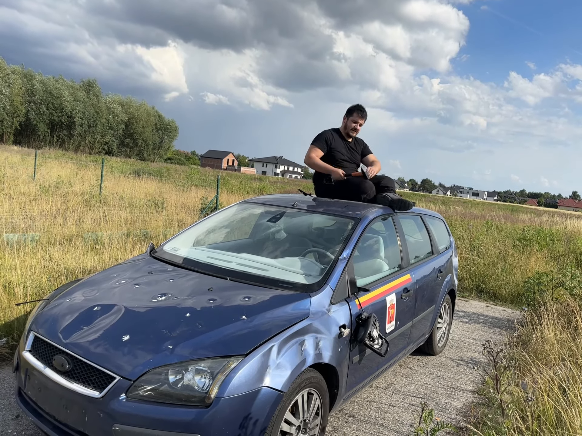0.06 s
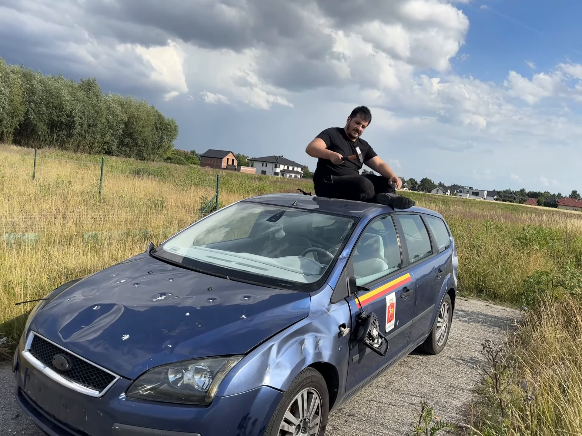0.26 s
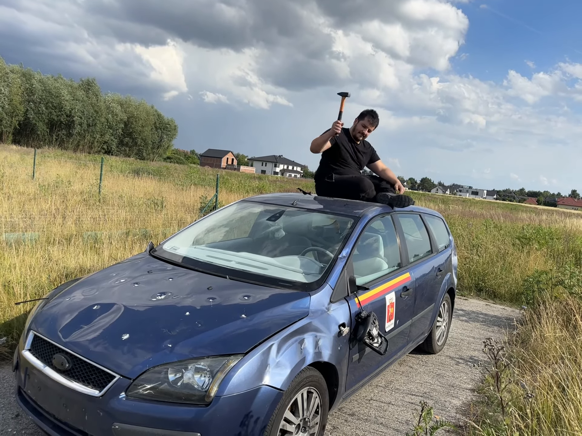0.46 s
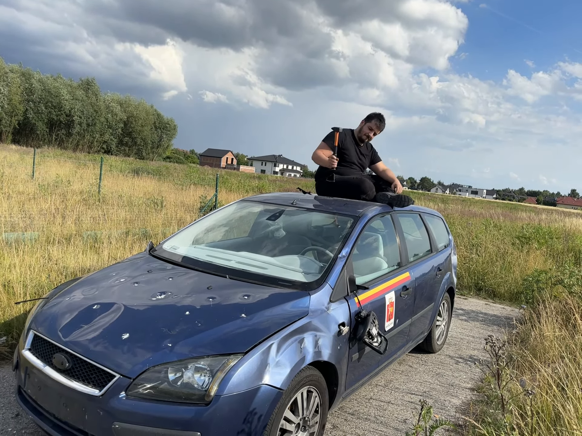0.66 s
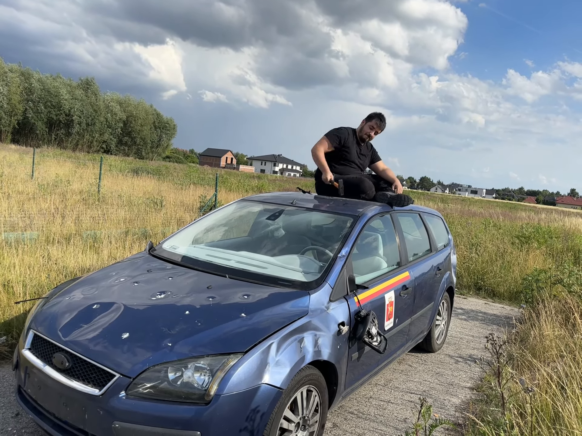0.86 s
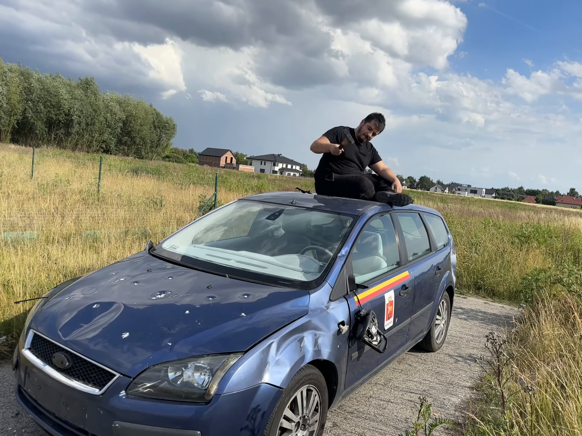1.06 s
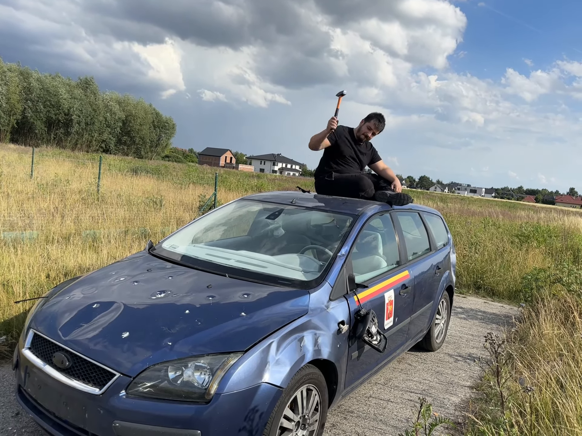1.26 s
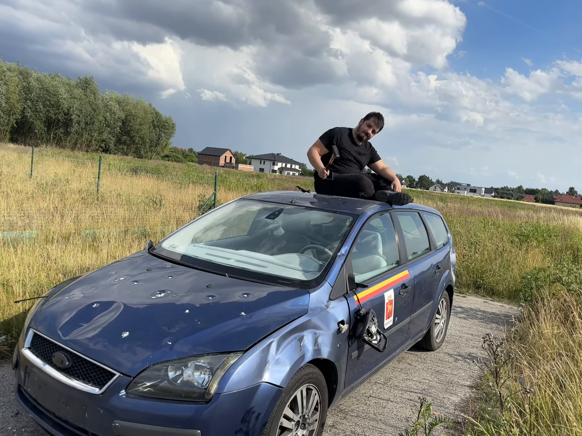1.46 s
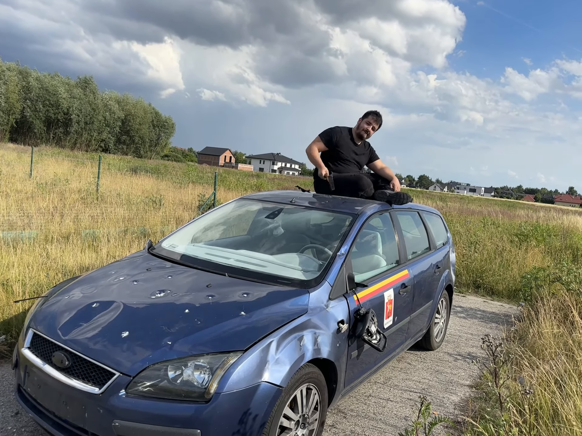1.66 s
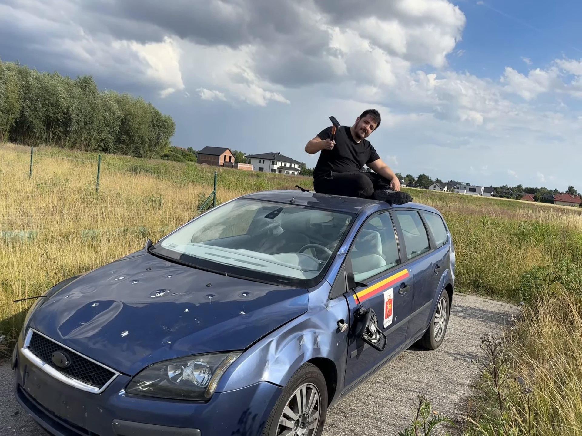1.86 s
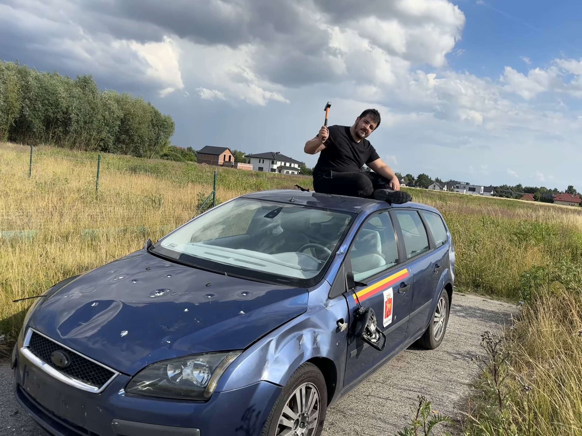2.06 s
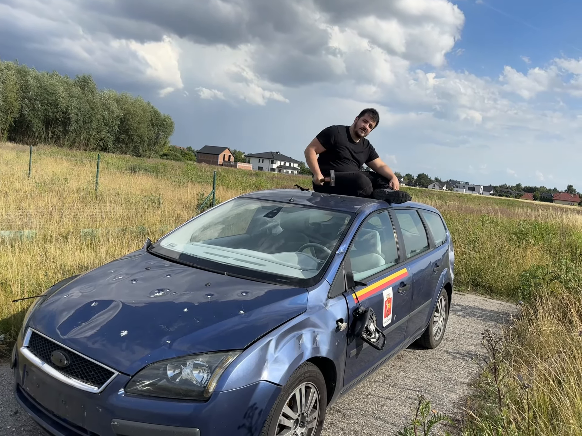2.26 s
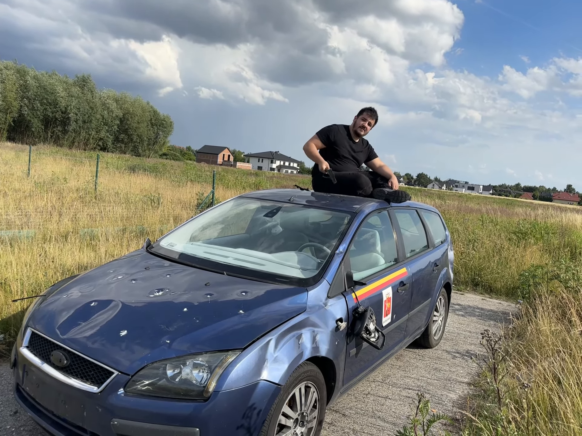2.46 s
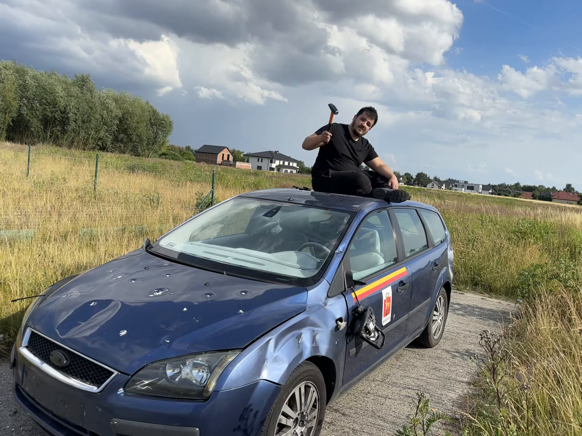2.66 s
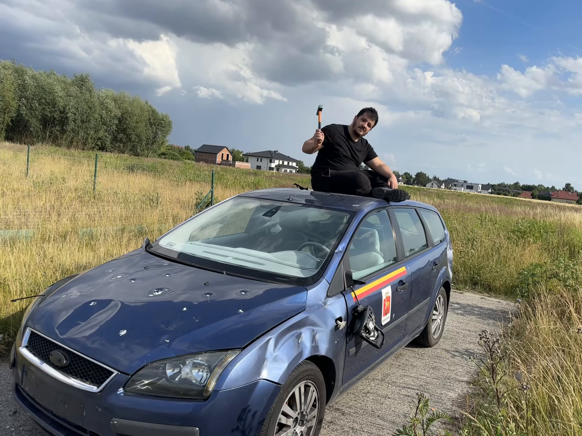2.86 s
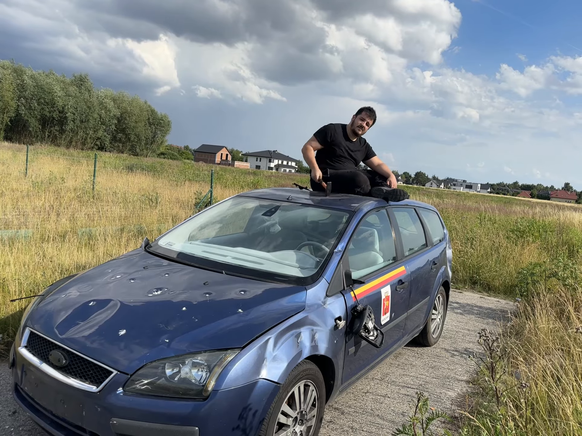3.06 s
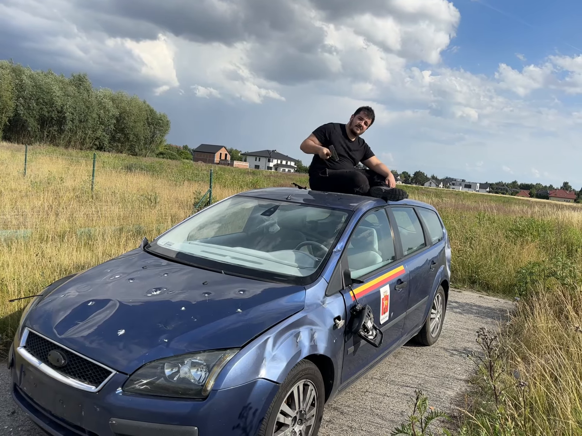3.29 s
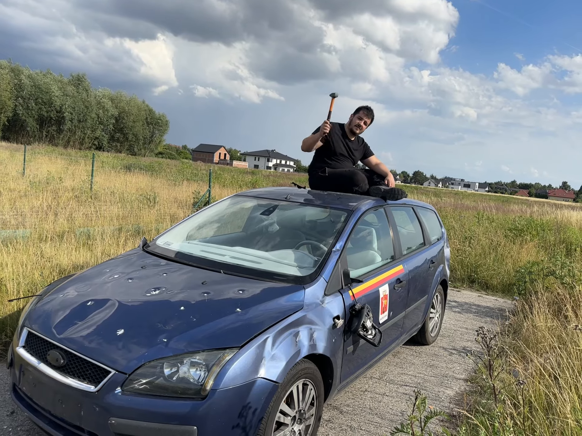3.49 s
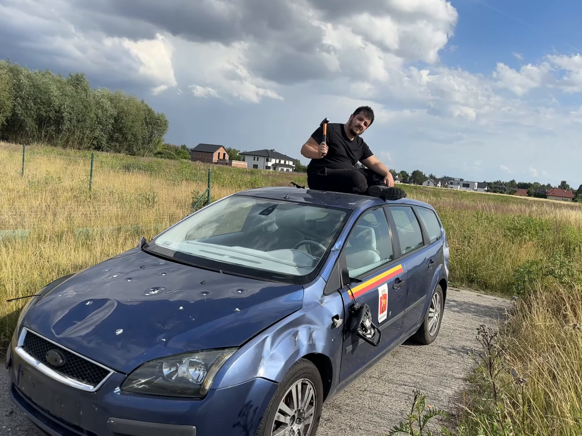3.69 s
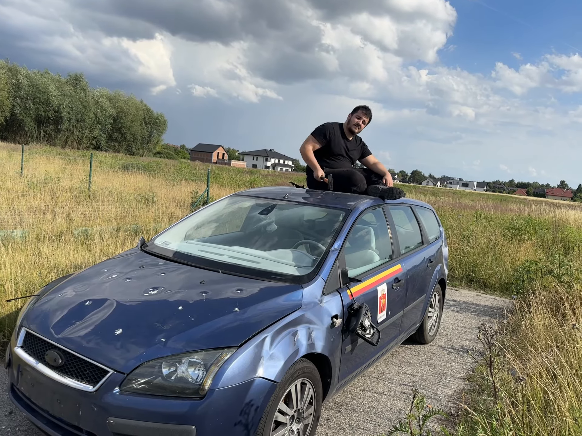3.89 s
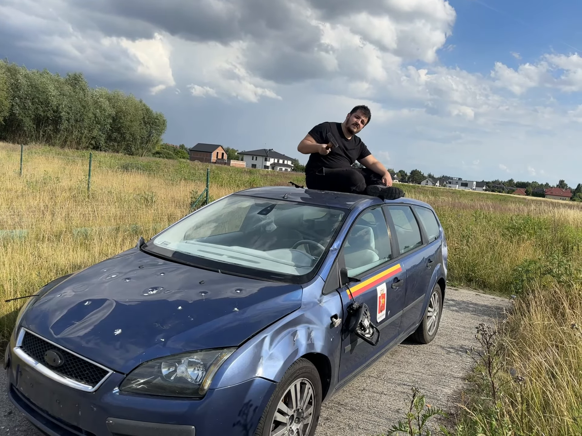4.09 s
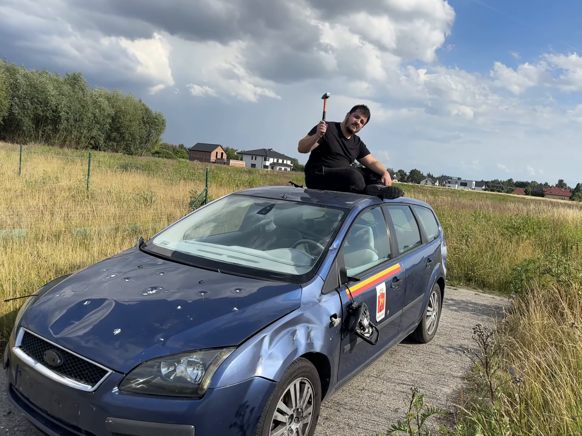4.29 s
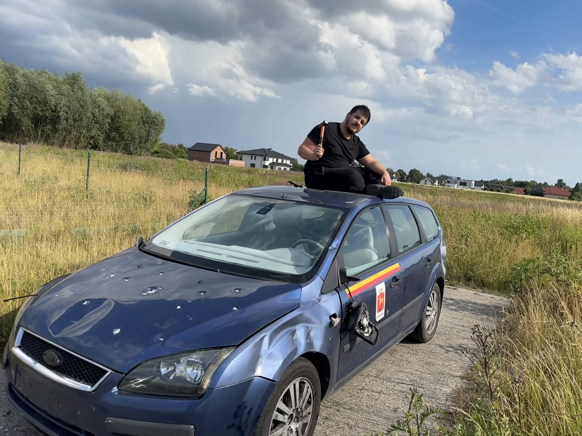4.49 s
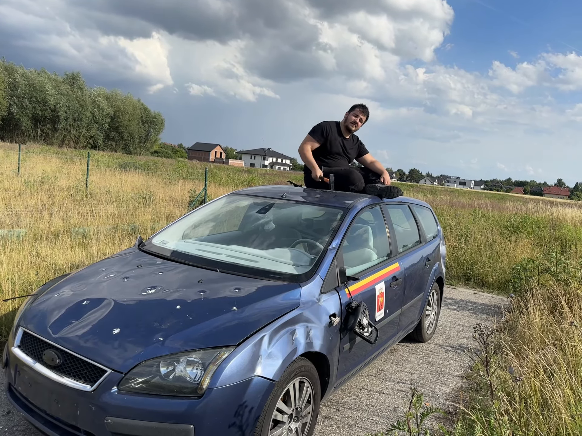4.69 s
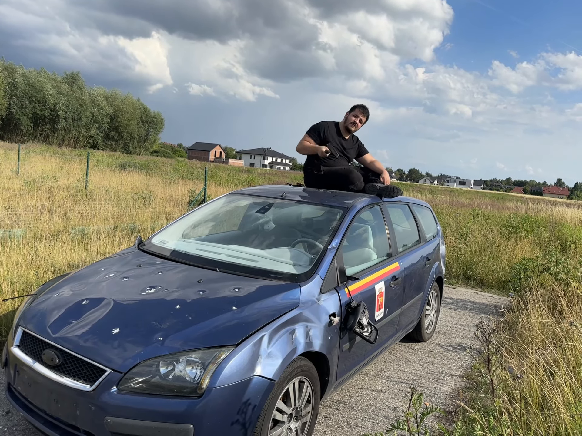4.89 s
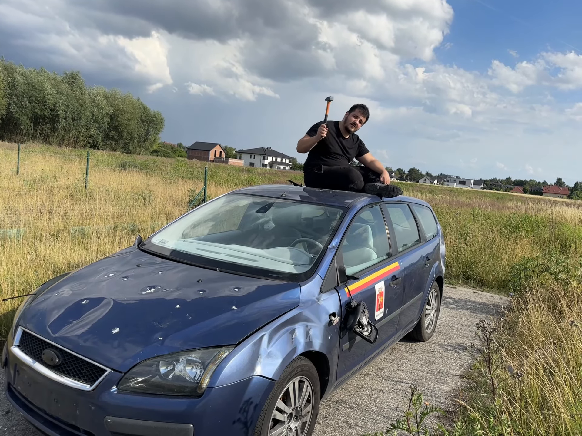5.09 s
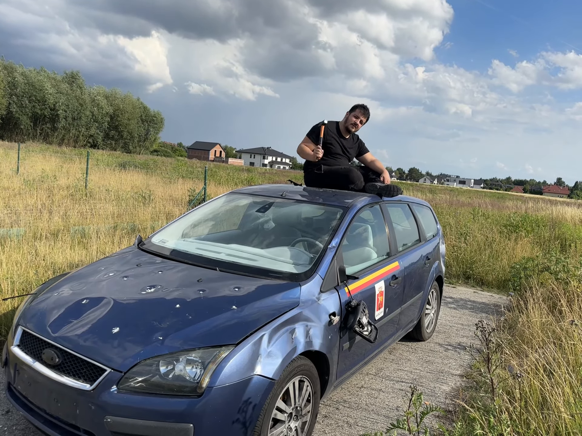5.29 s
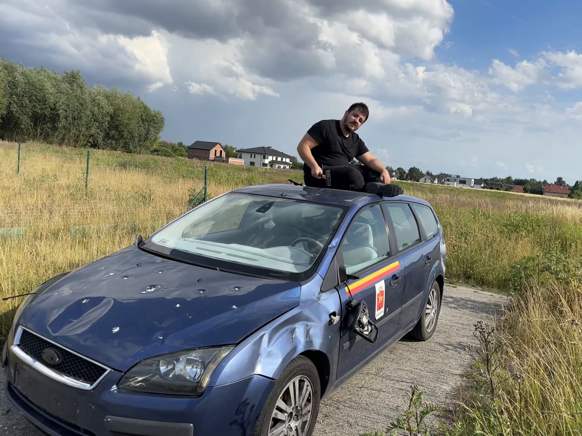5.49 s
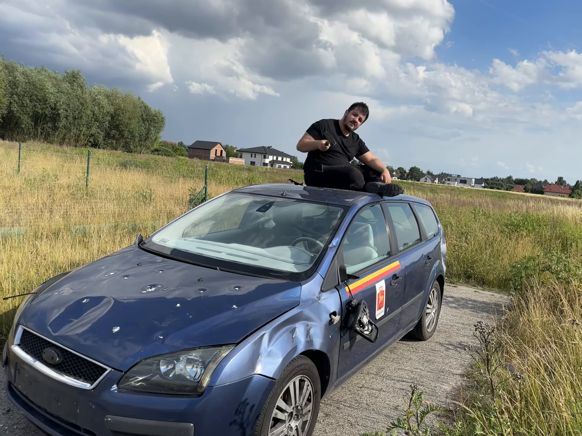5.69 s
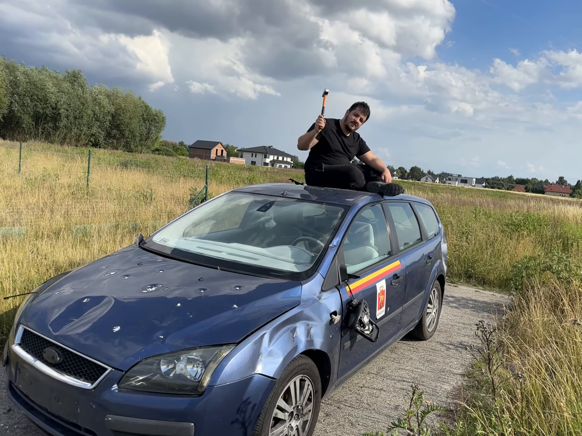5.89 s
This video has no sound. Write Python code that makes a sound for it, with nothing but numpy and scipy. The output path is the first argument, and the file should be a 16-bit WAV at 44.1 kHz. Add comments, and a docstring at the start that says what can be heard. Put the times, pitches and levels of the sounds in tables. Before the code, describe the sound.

Outdoors in an open field, a steel hammer beats a car's thin roof. After one light slap, seven hard blows follow about 0.77 seconds apart, each a sharp crack with a hollow, quickly damped panel clang, a springing shudder and ticking trim. A distant jet roars and whines softly, fading behind. Recorded dry from a few metres away, peaks limited.

```python
"""A hammer beats the sheet-metal roof of a car: each blow cracks, sends a falling sweep through the panel and
rings its modes; the panel bucks back and rattles loose trim. One light slap comes before the blows.
Far off a jet fades: four noise bands swell separately under a sine whine of sinking pitch.
Grasshoppers buzz as pulsed treble noise, faint birds squeak in blurred glides; a limiter holds the peaks."""
import sys
import numpy as np
from scipy import signal
from scipy.fft import rfft, irfft
from scipy.io import wavfile
from scipy.ndimage import uniform_filter1d, minimum_filter1d, map_coordinates

SR = 44100
rng = np.random.default_rng(int(sys.argv[2]) if len(sys.argv) > 2 else 0)


def to_wav(s):
    """Save 16-bit WAV."""
    ch = np.atleast_2d(s).T  # columns
    pcm = np.round(np.clip(ch, -1, 1) * 32767)  # PCM
    wavfile.write(sys.argv[1], SR, pcm.astype(np.int16))


def gain_from_db(level_db):
    """Turn a decibel level (scalar or array-like) into a linear amplitude factor."""
    decades = np.asarray(level_db, float) / 20
    return 10 ** decades


N = 262346


def unit(x):
    """Scaled to rms 1."""
    return x / np.sqrt(np.mean(x ** 2) + 1e-20)


def along(points, hz):
    """Interpolates (Hz, value) points on a log frequency axis."""
    f, v = np.transpose(points)
    return np.interp(np.log(hz + 1), np.log(f + 1), v)


def curves(rows):
    """One value per sample for each column after the time."""
    s, *cols = np.transpose(rows)
    return [np.interp(np.arange(N) / SR, s, c) for c in cols]


def wobble(rate_hz):
    """A smooth random curve, rate_hz knots a second."""
    knots = rng.standard_normal(N // 100)
    return map_coordinates(knots, [np.arange(N) * rate_hz / SR])


def noise(spectrum, shape):
    """Coloured noise of rms 1, silent outside its spectrum of (Hz, dB per Hz)."""
    white = rng.standard_normal(shape)
    hz = np.fft.rfftfreq(white.shape[-1], 1 / SR)
    inside = (hz >= spectrum[0][0]) & (hz <= spectrum[-1][0])
    return unit(irfft(rfft(white) * gain_from_db(along(spectrum, hz)) * inside, white.shape[-1]))


def place(times_s, sounds):
    """Each sound starts at its time."""
    out = np.zeros(N + SR)
    for s, sound in zip(times_s, sounds):
        out[round(s * SR):][:len(sound)] += sound
    return out[:N]


# Faint bird squeaks: start_s, length_s, from_hz, to_hz, level_db
SQUEAKS = [(0.258, 0.074, 9600, 7700, -71), (2.795, .045, 3350, 4000, -72), (2.837, .045, 3900, 3930, -72),
           (2.943, .042, 4300, 3500, -71)]


def birds():
    """Each squeak glides from one pitch to another, high ones blurred more by the air."""
    squeaks = []
    for _, length_s, from_hz, to_hz, level_db in SQUEAKS:
        u = np.linspace(0, 1, round(length_s * SR))
        hz = to_hz + (from_hz - to_hz) * (1 - u) ** 1.6
        tone = np.sin(np.pi * u) ** 1.2 * np.sin(2 * np.pi * np.cumsum(hz) / SR)
        blur = noise([(5, 0), (.03 * to_hz, -2), (.1 * to_hz, -9), (.2 * to_hz, -30)], len(u))
        squeaks.append(gain_from_db(level_db) * tone * blur)
    return place(np.transpose(SQUEAKS)[0], squeaks)


# Grasshopper loudness: time_s, level_db
GRASS_LEVEL = [(0, -77), (.5, -84), (1.5, -87), (1.75, -106), (3.85, -105), (4.05, -92), (5.06, -83),
               (5.95, -76.5)]


def grasshoppers():
    """Leg strokes buzz about 110 times a second."""
    stroke_hz = 110 + 9 * wobble(8)
    stroke = (.5 + .5 * np.cos(2 * np.pi * np.cumsum(stroke_hz) / SR)) ** 2.5
    rasp = noise([(11500, -39), (13000, -9.0), (15300, -3.5), (16200, -31.0)], N)
    buzz = unit((.25 + stroke) * gain_from_db(3 * wobble(60)) * rasp)
    return gain_from_db(curves(GRASS_LEVEL)[0]) * buzz


def patchy(x, depth_db):
    """Turbulent air makes patches of the sound swell and sink in time and frequency."""
    z = signal.stft(x, nperseg=2048)[2]
    field = uniform_filter1d(rng.standard_normal(z.shape), size=4, axis=0)
    field = uniform_filter1d(field, size=7, axis=1)
    return signal.istft(z * gain_from_db(depth_db * unit(field)), nperseg=2048)[1][:N]


# Jet noise loudness: time_s, rumble_db, roar_db, rush_db
JET_LEVEL = [(0.0, -47, -40, -46), (0.49, -36, -43.5, -48.5), (0.78, -39, -38.5, -45.5),
             (1.06, -41, -46, -51), (1.57, -38.5, -40.5, -47.5), (1.79, -43.5, -52, -57.5),
             (2.17, -45.5, -53.5, -57.5), (2.47, -44.5, -47.5, -59.5), (3.13, -46.5, -49.5, -60),
             (3.53, -49.5, -53.5, -61.5), (3.81, -47, -51, -59), (4.04, -45.5, -46.5, -55.5),
             (4.47, -48.5, -48, -55), (4.74, -42.5, -51, -55), (5.15, -49, -54, -61),
             (5.45, -47.5, -56, -59), (5.6, -47, -46, -54), (5.95, -49.5, -52.5, -59.5)]
# Jet hiss loudness: time_s, level_db
HISS_LEVEL_CURVE = [(0, -49.5), (.5, -51), (.8, -52), (.95, -61), (1.1, -53), (1.5, -50.5), (1.78, -58.5),
                    (3.1, -60.5), (3.55, -62.5), (4.0, -61), (4.75, -61), (5.2, -62.5), (5.6, -59),
                    (5.95, -63)]
# Spectra of the four bands, low to high: freq_hz, density_db_per_hz
RUMBLE_SPECTRUM = [(15, -66.5), (30, -37.5), (48, 4.5), (76, 9), (115, 5), (170, 0), (230, -45), (400, -82)]
ROAR_SPECTRUM = [(70, -95), (140, 0), (190, -0.5), (310, 1.5), (410, -5), (500, -15), (900, -86.5)]
RUSH_SPECTRUM = [(250, -99.5), (420, -2.5), (560, -1), (730, -2), (1200, -6), (1600, -18.5), (3000, -99)]
HISS_SPECTRUM = [(600, -84), (1100, 2.5), (1500, 3), (2200, -8), (3500, -18), (5500, -30.5), (7500, -48.5),
                 (12000, -41.5), (17000, -58.5)]


def jet_roar():
    """Moving air makes each band of the roar swell on its own."""
    levels_db = curves(JET_LEVEL) + curves(HISS_LEVEL_CURVE)  # joined lists: four bands
    swells_db = [0.77, 0.51, 1.55, 0.31]
    colours = [RUMBLE_SPECTRUM, ROAR_SPECTRUM, RUSH_SPECTRUM, HISS_SPECTRUM]
    roar = np.zeros(N)
    for level_db, swell_db, colour in zip(levels_db, swells_db, colours):
        roar += gain_from_db(level_db + swell_db * wobble(11)) * noise(colour, N)
    return patchy(roar, depth_db=1.67)


# Turbine pitch, sinking as the plane leaves: time_s, pitch_hz
WHINE_PITCH = [(0, 1369), (1.5, 1340), (3.0, 1316), (4.6, 1283), (5.95, 1286)]
# Turbine loudness, fading in and out on the wind: time_s, level_db
WHINE_LEVEL = [(0, -47), (.11, -61), (.155, -49.5), (.215, -61), (.3, -45), (.4, -49.5), (.53, -55),
               (.6, -43), (.66, -52.5), (.77, -52), (1.0, -74), (1.16, -49), (1.2, -72), (1.25, -51),
               (1.35, -64), (1.39, -54), (1.5, -57), (1.75, -76), (1.82, -56), (1.88, -67), (2.25, -66.5),
               (2.5, -51.5), (2.56, -65), (2.63, -54.5), (2.87, -66), (2.96, -56), (3.27, -67),
               (3.44, -61.5), (3.47, -75), (3.6, -58.5), (3.69, -78), (3.73, -55.5), (3.8, -52),
               (3.85, -72), (4.03, -60), (4.065, -52.5), (4.17, -54), (4.21, -77), (4.26, -52.5),
               (4.41, -65.5), (4.55, -51.5), (4.65, -53.5), (4.82, -59), (4.93, -52.5), (4.98, -59),
               (5.01, -79), (5.3, -66), (5.44, -58), (5.6, -65), (5.66, -57), (5.73, -73), (5.95, -67)]


def jet_whine():
    """A turbine sine with jittered phase and quickly wavering level."""
    flutter_db = 1.5
    phase = 2 * np.pi * np.cumsum(curves(WHINE_PITCH)[0]) / SR + 0.57 * wobble(23)
    level = gain_from_db(curves(WHINE_LEVEL)[0] + flutter_db * wobble(30))
    return np.sqrt(2) * level * np.sin(phase)


# Light slap on the roof: start_s, hiss_db, hiss_t60_s, thud_hz, thud_db
LIGHT_SLAP = [(.4365, -32.5, 0.065, 74, -25)]


def slap():
    """A dry hiss over one low push."""
    (s, hiss_db, hiss_t60_s, thud_hz, thud_db), = LIGHT_SLAP
    t = np.arange(SR // 8) / SR
    hiss = noise([(900, 6.0), (1800, 3), (5000, -2), (8000, -14.0), (15000, -19), (16500, -34)], len(t))
    hiss *= gain_from_db(hiss_db - 60 * t / hiss_t60_s)
    thud = -np.sin(2 * np.pi * thud_hz * t + 0.29) * gain_from_db(thud_db - 60 * t / 0.081)
    return place([s], [(1 - np.exp(-t / 0.0019)) * (hiss + thud)])


# Fainter ticks after every blow: delay_s, tip_db
RATTLE_LEVEL = [(.012, -46), (.03, -42.5), (.045, -54.5), (.065, -37.5), (.09, -44), (.115, -58.5),
                (0.129, -56)]
# Clearest ticks of loose trim and grit: start_s, tip_db
CLEAR_TICKS = [(.8308, -42), (0.8428, -41), (0.8778, -26), (0.88, -24), (.8873, -41), (0.893, -39),
               (0.905, -47), (.9109, -45), (.9478, -48.5), (.9681, -51), (1.3699, -63), (1.5774, -38),
               (1.609, -33), (1.6138, -34.5), (1.6305, -34.5), (1.649, -46), (1.6694, -53), (1.693, -53),
               (1.722, -60), (2.346, -38.5), (2.3524, -26), (2.358, -39), (2.388, -42), (2.4044, -35),
               (2.4214, -37), (2.4402, -56), (2.472, -52), (2.4941, -48), (2.501, -55), (2.8376, -53),
               (3.108, -35), (3.115, -28.5), (3.1423, -40), (3.159, -34), (3.1664, -34.5), (3.191, -44.5),
               (3.224, -51), (3.247, -55), (3.9016, -37), (3.9514, -49), (3.958, -33), (3.9883, -52.5),
               (4.01, -59), (4.7073, -36), (4.743, -38), (4.768, -50), (4.7747, -49), (5.1112, -50.5),
               (5.2215, -64), (5.4819, -30.5), (5.4886, -39), (5.5265, -44.5), (5.538, -38),
               (5.5716, -50.5), (5.6, -59), (5.6179, -58)]


def rattle(count):
    """Times and levels of count faint ticks at chance moments after each blow, then the clear ones."""
    scatter_db = 1
    delays_s, levels_db = np.transpose(RATTLE_LEVEL)
    share = (np.arange(count) + rng.random((len(HAMMER_BLOWS), count))) / count
    delay_s = delays_s[0] + share * (delays_s[-1] - delays_s[0])
    tip_db = np.interp(delay_s, delays_s, levels_db) + scatter_db * rng.standard_normal(delay_s.shape)
    s = np.transpose(HAMMER_BLOWS)[0][:, None] + delay_s
    faint = np.transpose([s.ravel(), tip_db.ravel()])
    return np.concatenate([faint, CLEAR_TICKS]).T


def ticks():
    """Tiny hard contacts: a bright tip with a faint after-rattle, and a duller body."""
    s, tip_db = rattle(count=18)
    body_db = -1.5 + 2 * rng.standard_normal(len(s))  # relative to the tip
    t = np.arange(SR // 25) / SR
    shape = (len(s), len(t))
    tip = noise([(5000, -20.0), (7500, -7.0), (11000, -4.5), (15000, 0.5), (16200, -16.0)], shape)
    body = noise([(1800, -10), (3000, -2.0), (5000, -4.5), (8500, -27)], shape)
    tip *= gain_from_db(-60 * t / 0.0048) + gain_from_db(-22.5 - 60 * t / 0.052)
    body *= gain_from_db(body_db[:, None] - 60 * t / 0.017)
    return place(s, gain_from_db(tip_db)[:, None] * (1 - np.exp(-t / 0.0007)) * (tip + body))


# First bending wave: freq_hz, magnitude_db
WAVE_SPECTRUM = [(40, -24), (70, -1.5), (200, 4), (400, -11), (800, -1), (1500, -10), (2500, -17.5),
                 (4000, -26.5), (8000, -44)]


def wave():
    """Bending waves run at the root of frequency: the first from the dent sweeps from treble to bass."""
    s, *_, wave_db = np.transpose(HAMMER_BLOWS)
    hz = np.fft.rfftfreq(SR // 8, 1 / SR)
    reach = .15 * np.exp(0.093 * rng.standard_normal((len(s), 1)))  # delay in s at 1 Hz
    sweep = irfft(gain_from_db(along(WAVE_SPECTRUM, hz)) * np.exp(-4j * np.pi * reach * np.sqrt(hz)))
    sweep *= np.linspace(1, 0, sweep.shape[1]) ** 2  # the sweep fades out over its eighth of a second
    return place(s - .0008, gain_from_db(wave_db)[:, None] * sweep / np.abs(sweep).max())


# Steel on steel: freq_hz, density_db_per_hz
CRACK_SPECTRUM = [(2000, 29), (4000, 28), (6500, 23.5), (8000, -4.5), (11000, 22), (15500, -24.5),
                  (17000, -51.5)]
# First touch of the hammer: freq_hz, density_db_per_hz
SPARK_SPECTRUM = [(6000, -28.5), (9000, -5), (12000, -4.5), (15000, 3.5), (16800, -20), (17200, -46)]


def crack():
    """The hammer face cracks on steel, then the dent crackles on in clumps."""
    s, crack_db = np.transpose(HAMMER_BLOWS)[:2]
    t = np.arange(SR // 5) / SR
    shape = (len(s), len(t))
    clumps = gain_from_db(3.2 * noise([(20, 2), (300, 0), (600, -18.5)], shape))
    crackle = clumps * (gain_from_db(-31.5 - 60 * t / 0.058) + gain_from_db(-41.5 - 60 * t / 0.44))
    snap = (gain_from_db(-11.0 - 60 * t / 0.017) + crackle) * noise(CRACK_SPECTRUM, shape)
    spark = gain_from_db(-8.5 - 60 * t / 0.013) * noise(SPARK_SPECTRUM, shape)
    return place(s, gain_from_db(crack_db)[:, None] * (1 - np.exp(-t / 0.00052)) * (snap + spark))


# Roof spectrum: freq_hz, density_db_per_hz
PANEL_SPECTRUM = [(26, -36), (45, 5.5), (146, -1), (331, 1), (563, -5.5), (673, -11.5), (735, -8),
                  (1150, -6), (1220, -3), (1340, -10), (1490, -10), (2540, -24), (9000, -76),
                  (11700, -85.5), (19800, -120)]
# Roof damping: freq_hz, t60_s
PANEL_DECAY = [(60, 0.086), (160, 0.19), (420, 0.2), (1100, 0.073), (2900, 0.049), (7700, 0.076)]


def plate(count):
    """The roof's dense bending modes, each with a weak slower after-ring from the rest of the body."""
    hz = 50 * 200 ** ((np.arange(count) + rng.random(count)) / count) ** .8
    uneven = np.exp(0.29 * rng.standard_normal(count))  # the lining damps some modes more
    t60_s = (along(PANEL_DECAY, hz) * uneven)[:, None]
    t = np.arange(SR // 3) / SR
    fade = gain_from_db(-60 * t / t60_s) + gain_from_db(-32.5 - 24 * t / t60_s)
    weight = gain_from_db(along(PANEL_SPECTRUM, hz) + 3.02 * rng.standard_normal(count))
    weight *= np.sqrt(np.gradient(hz) / t60_s[:, 0])  # mode spacing and decay set energy per Hz
    ring = fade * np.sin(2 * np.pi * (hz[:, None] * t + rng.random((count, 1))))
    return hz, t, ring * (weight / np.linalg.norm(weight))[:, None]


def contacts(s, level_db, boom_db, modes, spread, bright_db):
    """Each contact lands on a new spot, ringing the modes at new strengths; slow low waves arrive late."""
    hz, t, rings = modes
    low, high = 1 / (1 + (hz / 280) ** 4), 1 / (1 + (2000 / hz) ** 2)
    tilt_db = level_db[:, None] + boom_db[:, None] * low + bright_db * high
    strength = gain_from_db(tilt_db) * rng.standard_normal((len(s), len(hz)))
    arrival = (1 - np.exp(-t * np.sqrt(hz)[:, None] / spread)) ** 2
    return place(s, strength @ (rings * arrival))


# The panel shudders after each blow: start_s, level_db, boom_db
PANEL_SHUDDERS = [(.827, -4, -11), (1.577, -5.5, -12), (2.349, -1.5, -6.5), (3.11, -1.5, -1.5),
                  (3.899, -4.5, -23), (4.699, -3, -6), (5.487, -5.5, -6.5)]
# It springs back on its frame: touch_s, touch_level_db, slap_s, slap_level_db, slap_boom_db
FRAME_REBOUNDS = [(.857, -9.5, 0.87, 0, -18), (1.607, -5.5, 1.638, -8, -7), (2.389, -5.5, 2.416, -8, -23),
                  (3.149, -7, 3.146, -4, -13), (3.933, -9, 3.951, -7, -15), (4.734, -4.5, 4.77, -8, -4),
                  (5.514, -14, 5.531, -6, -4.5)]


def bucks():
    """Times, levels and booms of shudder, touch and slap, then of their uneven, weaker repeats."""
    shudder_gap_s, shudder_loss_db = .011, 5.5
    chatter_gap_s, chatter_loss_db, chatter_boom_db = .014, 11.5, 0.5
    touch_boom_db, midway_db, uneven_s = -7, -4.5, 0.00201
    firm, repeats = list(PANEL_SHUDDERS), []
    for s, db, boom_db in PANEL_SHUDDERS:
        repeats += [(s + k * shudder_gap_s, db - k * shudder_loss_db, boom_db) for k in range(1, 3)]
    for touch_s, touch_db, s, db, boom_db in FRAME_REBOUNDS:
        firm += [(touch_s, touch_db, touch_boom_db), (s, db, boom_db)]
        repeats += [((touch_s + s) / 2, db + midway_db, touch_boom_db)]  # between touch and slap
        repeats += [(s + k * chatter_gap_s, db - k * chatter_loss_db, chatter_boom_db) for k in range(1, 4)]
    repeats = np.array(repeats)
    repeats[:, 0] += uneven_s * rng.standard_normal(len(repeats))
    return np.concatenate([firm, repeats]).T


# Hammer blows: start_s, crack_db, ring_db, boom_over_ring_db, wave_db
HAMMER_BLOWS = [(0.8116, -12.5, -6, -3, -3.5), (1.5619, -12, -6.5, -32, -2), (2.3309, -10.5, -8, 0.5, -5.5),
                (3.0933, -15.5, -5.5, 0.5, -8.5), (3.8816, -14, -5, -1.5, -7), (4.6817, -14, -4, -7, -7.5),
                (5.463, -11.5, -5, 0, -7.5)]


def roof():
    """Hard blows ring the panel's modes, then its softer bucking rings them duller."""
    modes = plate(count=500)
    s, _, ring_db, boom_db, _ = np.transpose(HAMMER_BLOWS)
    blows = contacts(s, ring_db, boom_db, modes, spread=0.086, bright_db=13.5)
    return blows + contacts(*bucks(), modes, spread=0.046, bright_db=-7)


def scene():
    """Jet and insects behind, hammering in front."""
    background = birds() + grasshoppers() + jet_roar() + jet_whine()
    hammering = slap() + ticks() + wave() + crack() + roof()
    return (background + hammering)[None]


def low_pass(x):
    """Removes everything above the highest recorded frequency."""
    return signal.sosfilt(signal.butter(12, 17090, fs=SR, output="sos"), x)


def record(dry):
    """The microphone drops the deepest bass; a quick limiter holds the peaks."""
    dry = signal.sosfilt(signal.butter(2, 48, "high", fs=SR, output="sos"), dry)
    need = np.minimum(1, .66 / (np.abs(dry) + 1e-9))
    gain = uniform_filter1d(minimum_filter1d(need, size=61), size=31)
    return low_pass(dry * gain)


dry = scene()
out = record(dry)
to_wav(out)
```